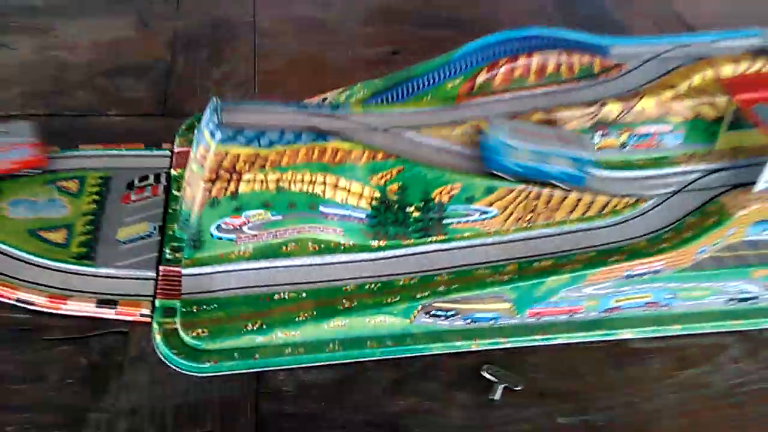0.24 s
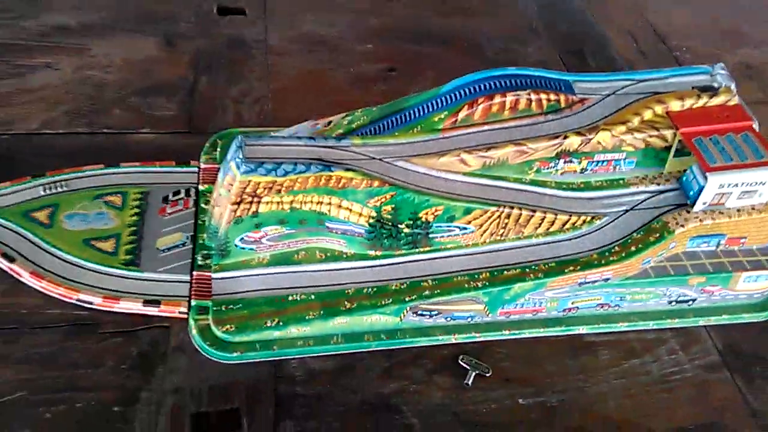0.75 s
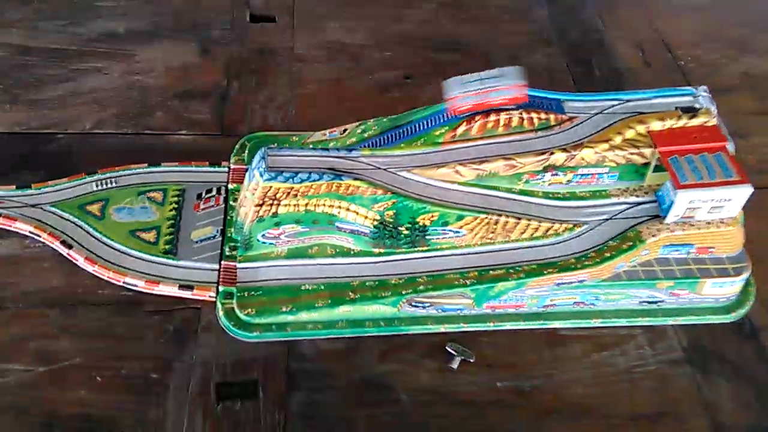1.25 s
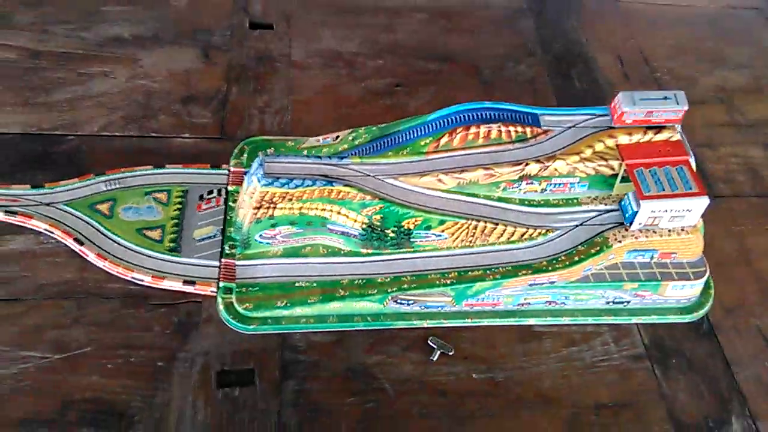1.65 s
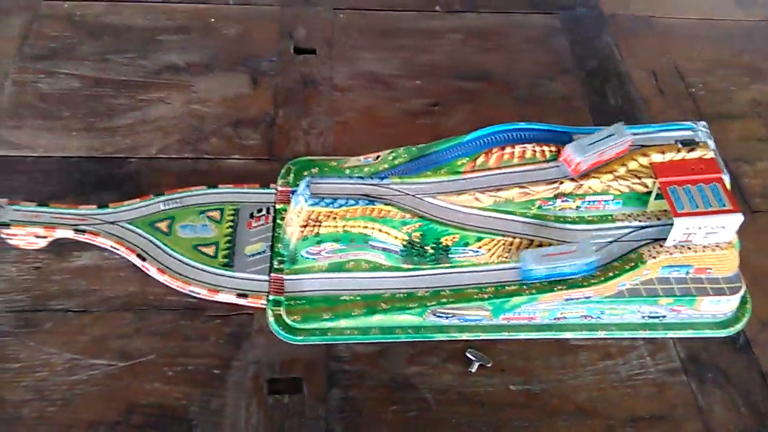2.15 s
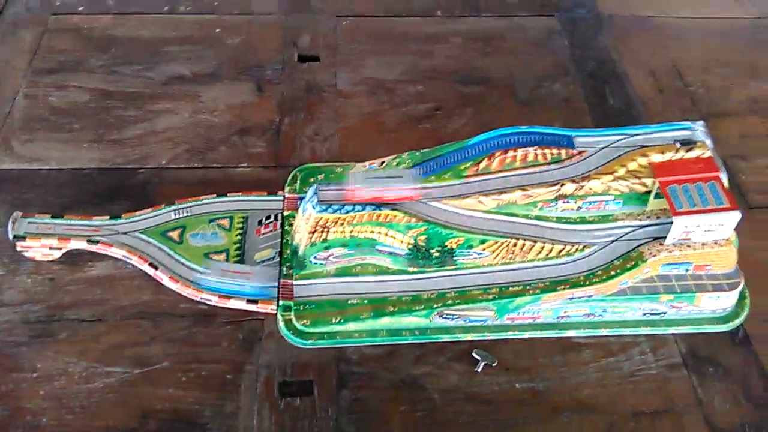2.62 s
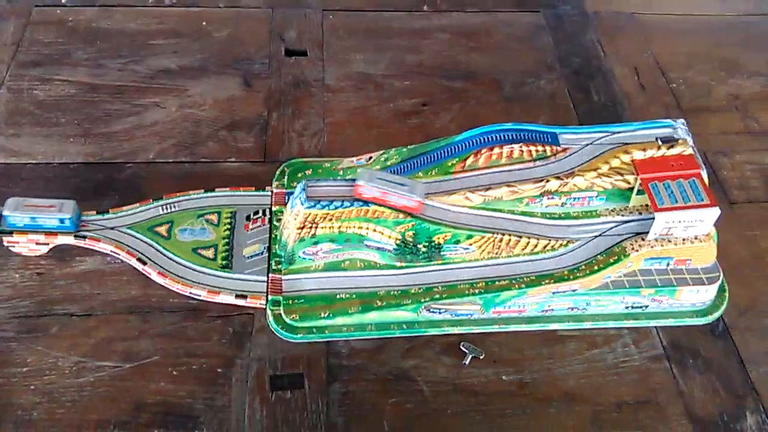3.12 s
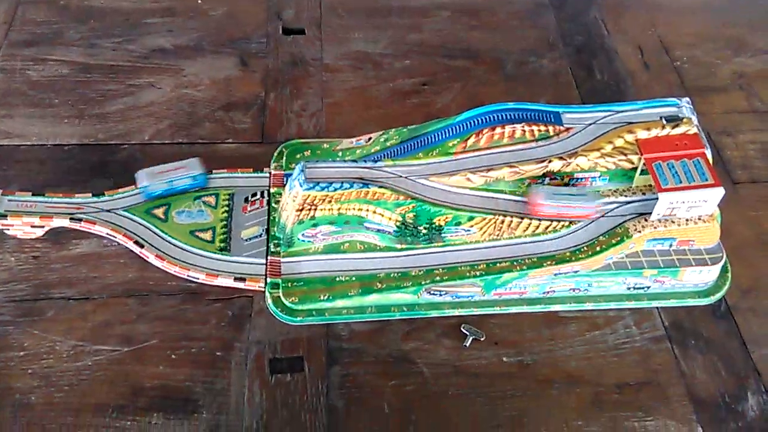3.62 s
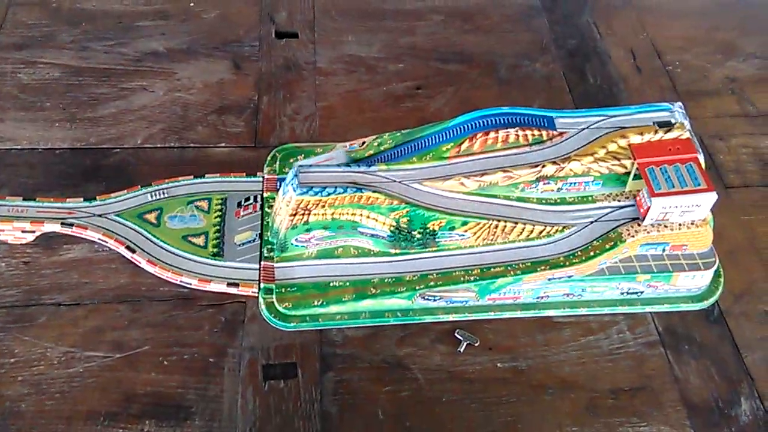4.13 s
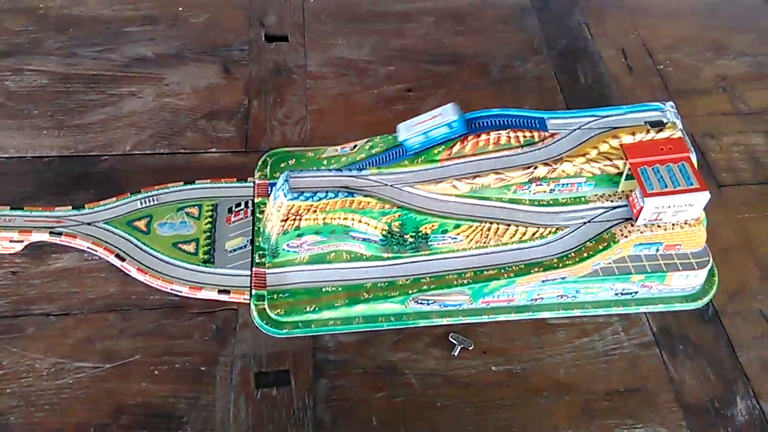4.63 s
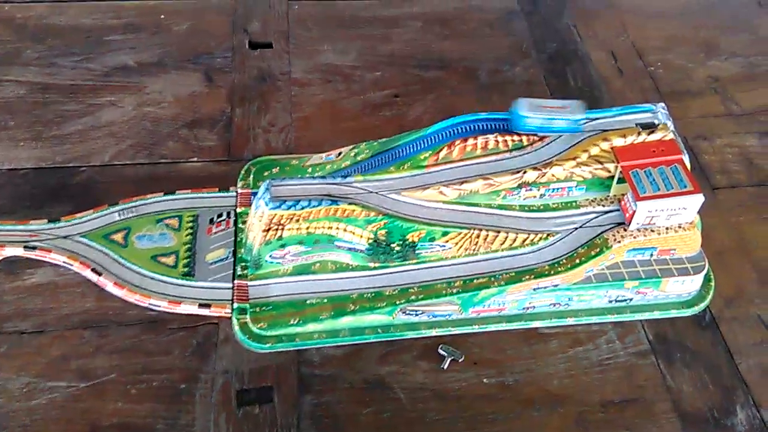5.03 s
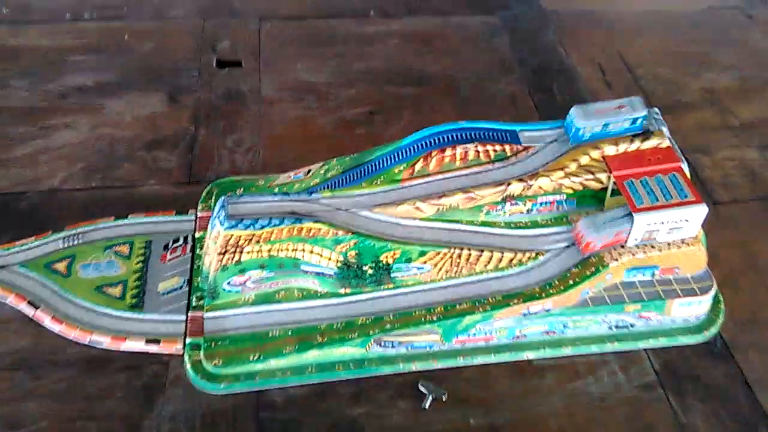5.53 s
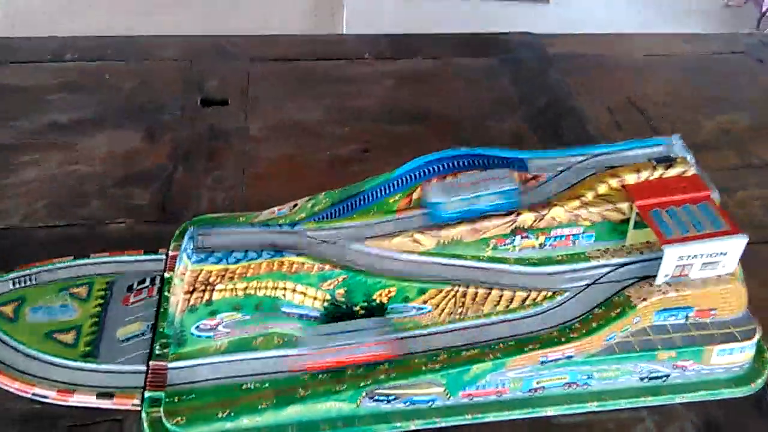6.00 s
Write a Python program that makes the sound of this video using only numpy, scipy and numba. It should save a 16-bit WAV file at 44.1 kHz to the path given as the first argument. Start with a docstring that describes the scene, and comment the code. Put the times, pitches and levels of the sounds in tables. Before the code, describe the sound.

Close handheld pickup in a small room: two wind-up tin cars circle a pressed metal track on a wooden table. A swelling roll and knocks lead to a loud ticking rattle up the hill, then quieter downhill rolling with clacks and clanks. A hard metallic knock starts a second rattling climb, softer in its middle, before final knocks and another swelling roll. Low thumps of the hand mark the first seconds.

```python
"""Tin cars on a clockwork track

Two clockwork tin cars run round a pressed tin track on a wooden table, heard from a hand-held phone.
Random contacts strike ringing tin: the sheet chatters and booms, wheels roll and loose bodies buzz.
Gears tick on the hill; cars knock at joints, bends and stops; panels clack, scrape and sing.
A small room answers with a noise tail, the hand bumps the phone, mostly at first,
and a limiter holds down the loudest rattles."""
import sys
import numpy as np
from scipy import signal
from scipy.fft import rfft, irfft
from scipy.io import wavfile
from scipy.ndimage import uniform_filter1d
from numba import njit

SR = 44100
rng = np.random.default_rng(int(sys.argv[2]) if len(sys.argv) > 2 else 0)


def bounce(signal):
    """Save signal as a 16-bit WAV file at the path given by the first command-line argument."""
    frames = np.transpose(np.atleast_2d(signal))
    limited = np.clip(frames, -1, 1)
    pcm = np.round(limited * 32767).astype(np.int16)
    wavfile.write(sys.argv[1], SR, pcm)


N = 276066
T = np.arange(N) / SR
RING = SR // 5  # samples in which the tin dies away

# modes of the tin track before any shift: f/Hz, energy level/dB, t60/s
TRACK_MODES = [(257, -6, .2), (338, -1, .16), (594, -10, .15), (788, -10, .13), (884, -4, .13),
               (1003, 0, .16), (1480, 0, .08), (1830, -1, .09), (2178, 0, .1), (2420, -2, .14),
               (2950, -7, .1), (3074, -6, .1), (3740, -4, .05), (4022, -7, .14), (6050, -13, .2)]
# dull colour of wheels and joints striking the track: f/Hz, level/dB
THUD_COLOUR = [(150, -8.5), (340, 7.5), (600, 4), (1000, 9), (1600, 17.5), (2200, 16.5), (2800, 18),
               (3600, -62), (5500, -25), (8000, -60.5)]


def mode_rings():
    """A decaying sine and cosine for each track mode, so that random mixes have random phases."""
    rings = []
    t = T[:RING]
    for hz, db, t60 in TRACK_MODES:
        decay = 10 ** (db / 20) / np.sqrt(t60) * np.exp(-np.log(1000) * t / t60)
        rings.append(decay * np.sin(2 * np.pi * hz * t))
        rings.append(decay * np.cos(2 * np.pi * hz * t))
    return np.array(rings)


MODE_RINGS = mode_rings()


def undb(db):
    """Amplitude factor of a level in dB."""
    return 10 ** (np.asarray(db) / 20)


def unit(x):
    """Scale to an energy of 1."""
    return x / np.sqrt(np.sum(x ** 2))


def curves(table):
    """The columns of a table, joined by straight lines in time."""
    s, *columns = np.transpose(table)
    return [np.interp(T, s, c) for c in columns]


def through(x, response):
    """Filter x with an impulse response, keeping its length."""
    return signal.oaconvolve(x, response)[:len(x)]


def add(out, s, x):
    """Mix x into out from time s."""
    i = max(int(s * SR), 0)
    out[i:i + len(x)] += x[:max(N - i, 0)]


def colour(points, size=2048):
    """Causal minimum-phase response of energy 1 with the given (Hz, dB) outline."""
    hz, db = np.transpose(points)
    log_hz = np.log(np.fft.rfftfreq(size, 1 / SR) + 1)
    gain = undb(np.interp(log_hz, np.log(hz), db))
    # folding the cepstrum forward in time makes the response causal
    cepstrum = irfft(np.log(gain))
    cepstrum[1:size // 2] *= 2
    cepstrum[size // 2 + 1:] = 0
    return unit(irfft(np.exp(rfft(cepstrum))))


def walk(rate):
    """Random wander with a spread near 1, through `rate` new values a second."""
    knots = rng.standard_normal(4096)
    return np.interp(T * rate, np.arange(len(knots)), knots)


def steady(x, size=3000):
    """Hold the rms near 1 over some tens of milliseconds, keeping the finer grain."""
    power = uniform_filter1d(uniform_filter1d(x ** 2, size), size // 2)
    return x / np.sqrt(np.abs(power) + 1e-12)


def fade(t60, size=RING):
    """Exponential decay that falls 60 dB in t60 seconds."""
    return np.exp(-np.log(1000) * T[:size] / t60)


@njit
def resonate(x, hz, width):
    """Band-pass whose centre moves; centre and width in Hz."""
    y, b, l = np.empty(len(x)), 0., 0.
    for i in range(len(x)):
        g, k = np.tan(np.pi * hz[i] / SR), width / hz[i]
        v = (b + g * (x[i] - l)) / (1 + g * (g + k))
        b, l, y[i] = 2 * v - b, l + 2 * g * v, k * v
    return y


@njit
def follow(x, attack, release):
    """Envelope that rises fast and falls slowly."""
    y, e = np.empty(len(x)), 0.
    for i in range(len(x)):
        e += (x[i] - e) * (attack if x[i] > e else release)
        y[i] = e
    return y


def gate(s, length):
    """Quick attack, hold, and a release that falls evenly in dB."""
    attack_s, release_db_per_s = 0.038, 246.5
    attack = np.clip((T - s) / attack_s, 0, 1)
    return attack * undb(-release_db_per_s * np.clip(T - s - length, 0, 1))


def shimmer(t60, crack_db):
    """A crack followed by the countless close modes of thin sheet, as decaying noise."""
    decay = fade(t60)
    ring = unit(rng.standard_normal(len(decay)) * decay)
    ring[0] += undb(crack_db)
    return unit(ring)


def track_ring(mode_shift=0.0097):
    """The track's strong modes, struck at one random place; the weight of the car shifts them a little."""
    ring = np.einsum("m,mt->t", rng.standard_normal(len(MODE_RINGS)), MODE_RINGS)
    t = T[:RING]
    stretched = t * (1 + mode_shift * rng.standard_normal())
    return unit(np.interp(stretched, t, ring, right=0))


def taps(rate, spread_db, hop):
    """Tiny metal contacts of uneven size, bunched by the hopping of the cars (hop in dB)."""
    hits = rng.random(N) < rate / SR
    signs = rng.choice([-1, 1], N)
    return steady(hits * signs * undb(spread_db * rng.standard_normal(N) + hop))


def air():
    """A steady hiss of coloured noise."""
    # colour of the air: f/Hz, level/dB
    air_colour = [(30, -18.5), (100, -9.5), (340, -1), (700, 12.5), (2400, 5.5), (3400, -31), (5000, 5),
                  (8000, -20.5), (14000, -47)]
    return undb(-58.5) * through(rng.standard_normal(N), colour(air_colour))


def hand():
    """Soft bumps of a cycle or two on the phone's case, over the low noise of the grip."""
    # colour of the grip's rumble: f/Hz, level/dB
    rumble_colour = [(20, -23), (40, -2), (60, -1), (110, -1.5), (200, -9), (400, -26), (900, -79.5)]
    # the hand shifts its grip: t/s, length/s, rumble level/dB
    grip_shifts = [(0.005, 1.87, -37), (2.014, 0.46, -45.5), (2.52, 0.36, -57), (3.7, 0.35, -55),
                   (5.11, 0.77, -63)]
    # bumps on the case: t/s, strength/dB, f of the settled pitch/Hz
    bumps = [(0.035, -18.5, 234), (0.066, -17, 180), (0.073, -16, 67), (0.206, -24, 94), (0.335, -13.5, 87),
             (0.467, -16, 104), (0.604, -29, 90), (0.883, -14, 72), (1.014, -20, 82), (1.06, -22, 85),
             (1.162, -16, 87), (1.302, -28, 84.3), (1.403, -12, 70), (1.463, -19, 76), (1.811, -20.5, 73.6),
             (2.117, -21, 83), (2.148, -18, 99), (2.335, -27, 110), (2.441, -16.5, 116), (2.484, -21, 76.4),
             (3.97, -34, 80), (5.889, -24.5, 230)]
    rest_db = -71.5  # the resting hand
    grip = undb(rest_db) + sum(undb(db) * gate(s, length) for s, length, db in grip_shifts)
    out = through(rng.standard_normal(N), colour(rumble_colour)) * grip
    out *= undb(5 * walk(16))  # uneven pressure
    t = T[:SR // 4]
    for s, db, hz in bumps:
        cycles = hz * t
        push = cycles / 0.9 * np.exp(1 - cycles / 0.48)
        bent_cycles = cycles * (1 + 0.68 * np.exp(-cycles))  # the pitch starts high
        add(out, s, undb(db) * push * np.sin(2 * np.pi * bent_cycles))
    return out


def room(x):
    """Reflections from table and walls as a short, dull noise tail that starts after 8 ms."""
    decay = fade(.35, size=SR // 3)
    tail = rng.standard_normal(len(decay)) * decay * (T[:len(decay)] > .008)
    dull = signal.butter(1, 6000, fs=SR, output="sos")
    return through(x, unit(signal.sosfilt(dull, tail)))


def pings():
    """A jolt sets a lightly damped tin mode singing; a close twin beats against it and the level trembles."""
    # singing modes: t/s, f/Hz, level/dB, t60/s
    singing_modes = [(0.004, 4350, -49, 0.19), (3.899, 4840, -28, .35), (5.43, 4990, -38, 0.29)]
    split_hz, twin_db = 39, -10.5
    out = np.zeros(N)
    for s, hz, db, t60 in singing_modes:
        decay = fade(t60, size=SR // 2)
        t = T[:len(decay)]
        twin = undb(twin_db) * np.sin(2 * np.pi * (hz + split_hz) * t)
        pair = np.sin(2 * np.pi * hz * t) + twin
        onset = np.minimum(t / .002, 1)
        add(out, s, undb(db) * decay * onset * pair)
    return out * undb(3 * walk(150))


def clacks(count=5):
    """A wheel drops onto a panel: a dull crack with a cluster of close panel modes that dies quickly."""
    # wheel drops: t/s, f around which the panel rings/Hz, level/dB
    wheel_drops = [(1.072, 1475, -22), (2.327, 1450, -28), (2.43, 1390, -35.5), (2.475, 1435, -37),
                   (2.525, 1440, -27), (2.562, 1520, -30), (2.595, 1346, -24), (2.653, 1367, -24),
                   (4.167, 1700, -21), (4.21, 1550, -25), (4.607, 2160, -31), (4.636, 2250, -26),
                   (4.746, 1570, -31.5), (4.924, 1434, -31.5), (5.627, 1453, -29.5), (5.837, 1793, -24.5),
                   (5.855, 1337, -25), (5.9, 1345, -29), (6.017, 1132, -28), (6.054, 1417, -26),
                   (6.099, 1250, -29), (6.156, 1280, -15)]
    ring_t60_s, crack_db = 0.07, -21.5
    out, t = np.zeros(N), T[:RING]
    thud = colour(THUD_COLOUR)
    for s, hz, db in wheel_drops:
        modes_hz = hz * (1 + 0.03 * rng.standard_normal((count, 1)))
        modes = rng.standard_normal((count, 1)) * np.sin(2 * np.pi * modes_hz * t)
        ring = unit(np.sum(modes, axis=0) * fade(ring_t60_s))
        crack = through(shimmer(t60=0.058, crack_db=-5.0), thud)
        # turns unit energy into a level at the start of the decay
        start_level = np.sqrt(SR * ring_t60_s / np.log(1e6))
        add(out, s, undb(db) * start_level * (ring + undb(crack_db) * crack))
    return signal.sosfilt(signal.butter(6, [600, 3000], "band", fs=SR, output="sos"), out)


def panels(width_share=0.047, edge=0.0033, waver=.012):
    """Scraping wheels keep one mode of a panel ringing, with a rough grain and a wavering pitch."""
    # scraped panels: t/s, length/s, f before wavering/Hz, rms level/dB
    scraped_panels = [(0.354, 0.19, 1494, -29), (0.377, 0.093, 940, -46), (1.008, 0.031, 988, -24.5),
                      (1.366, 0.091, 1490, -26.5), (1.46, 0.093, 1454, -27), (1.737, 0.089, 846, -34),
                      (1.933, 0.065, 956, -41), (2.454, .2, 1353, -39), (2.767, .14, 1520, -33),
                      (2.979, 0.031, 1605, -23), (3.113, 0.055, 2140, -26.5), (3.501, 0.057, 2260, -47),
                      (3.503, 0.06, 2820, -51.5), (3.623, 0.041, 1403, -35.5), (3.764, 0.057, 1840, -22),
                      (4.478, 0.23, 2190, -37.5), (4.73, 0.23, 2610, -39), (5.03, 0.11, 1494, -27.5),
                      (5.033, 0.072, 457, -34.5), (5.624, 0.18, 904, -47.5), (6.067, 0.067, 1345, -32.5),
                      (6.126, 0.1, 2310, -35.5), (6.169, 0.075, 1290, -29)]
    out = np.zeros(N)
    scrape = taps(800, 2.5, 3 * walk(70))
    bend = 1 + waver * walk(25)
    for s, length, hz, db in scraped_panels:
        t = T[:int((length + edge) * SR)]
        centre, drive = (np.roll(v, -int(s * SR))[:len(t)] for v in (hz * bend, scrape))
        narrow = resonate(drive, centre, width_share * hz)
        ring = steady(resonate(narrow, centre, 3 * width_share * hz), size=1000)
        ring *= np.clip((length + edge - t) / (2 * edge), 0, 1)
        add(out, s, undb(db) * unit(ring) * np.sqrt(length * SR))
    return out


def ratchet(count=100):
    """Each gear tooth shakes a crisp tick out of the car's tin body, nearly in step and uneven in strength."""
    # colour of a tooth: f/Hz, level/dB
    tooth_colour = [(1200, -23.5), (2300, 6.5), (3000, 5.5), (3700, 2), (4700, -1.5), (5600, -0.5),
                    (6400, -10), (8000, -41), (10000, -52)]
    # pulls of the gear: t/s, length/s, tooth rate/Hz, level/dB, f of the body's ring/Hz, its width/Hz
    gear_pulls = [(0.598, 0.93, 83.5, -31, 3900, 2200), (4.478, 0.67, 61.3, -39.5, 4770, 700)]
    out = np.zeros(N)
    tooth = colour(tooth_colour)
    for s, length, teeth_hz, db, ring_hz, width_hz in gear_pulls:
        body = unit(resonate(tooth, np.full(len(tooth), float(ring_hz)), float(width_hz)))
        late, strength = rng.standard_normal((2, count))
        for k in range(min(count, int(length * teeth_hz))):
            tick = through(shimmer(t60=.025, crack_db=-6), body) * undb(db + 1.5 * strength[k])
            # the level is that of the run of ticks, whatever their rate
            add(out, s + (k + .04 * late[k]) / teeth_hz, tick * np.sqrt(SR / teeth_hz))
    return out


def knocks(count=4):
    """A car strikes a joint, bend or stop; track and body ring together, and hard knocks bounce for longer."""
    # colour of the body's clink: f/Hz, level/dB
    clink_colour = [(1500, -6.5), (3200, 5), (4400, 15), (5200, 17), (6500, 4), (7300, -12), (8100, -29.5),
                    (9200, -19), (10400, -35), (14000, -87)]
    # strikes: t/s, energy level of the track's thud/dB, energy level of the body's clink/dB
    strikes = [(0.1227, -2, 8.5), (0.31, 4, -2.5), (0.589, 0, -4), (0.633, -6, 3.5), (1.688, -17, 3),
               (1.714, -11, 1), (1.762, 3, -1.5), (1.921, -13, -14.5), (1.969, -15, -9.5),
               (2.043, -27, -18), (2.18, -12, -6.5), (2.204, -15, -21), (2.24, -26, -15.5),
               (2.679, 3, -2.5), (2.918, 3, 0), (2.983, -1, -10), (3.049, -32, -7), (3.12, 0.5, -1.5),
               (3.153, -0.5, 1.5), (3.347, -27, -35), (3.491, -31, -31), (3.502, -11, -19),
               (3.658, 2.5, -8), (3.9, 7, 9), (4.118, 10.5, 4), (4.916, -8.5, -8), (5.043, -10, -3),
               (5.122, -0.5, 0.5), (5.138, 4, -3.5), (5.322, -23, -9.5), (5.37, -5, -8), (5.39, 2.5, -4),
               (5.411, 1, -16), (5.43, -6, -4), (5.586, -20, -8.5), (5.616, -21, -23), (5.628, -23, -7),
               (5.834, -6, -2.5), (5.856, -17, -8.5), (5.891, -10.5, -8.5), (6.241, 4.5, -9)]
    bounce_loss_db, ease = 7.5, 1  # loss per bounce after a 0 dB knock; dB less loss per dB of strength
    out = np.zeros(N)
    thud, clink = colour(THUD_COLOUR), colour(clink_colour)
    for s, thud_db, clink_db in strikes:
        gaps = rng.uniform(.006, 0.021, count)
        loss_db = max(3, bounce_loss_db - ease * max(thud_db, clink_db))
        for k in range(count):
            track = through(shimmer(t60=0.099, crack_db=-5.0) + undb(-25.0) * track_ring(), thud)
            body = through(shimmer(t60=0.13, crack_db=-11.5) + undb(-30.5) * track_ring(), clink)
            both = undb(thud_db) * track + undb(clink_db) * body
            add(out, s + gaps[:k].sum(), undb(-loss_db * k) * both)
    return out


def contact():
    """Gain that dips briefly as the climbing car loses contact and its rattle drops out."""
    # slips on the hill: t/s, half length/s, depth/dB
    slips = [(4.465, 0.061, 2.5), (4.848, 0.0049, 8), (4.879, 0.0053, 8), (4.915, 0.0063, 8)]
    return undb(-sum(depth_db * np.exp(-((T - s) / half) ** 2) for s, half, depth_db in slips))


def coast(s, length, *dbs):
    """Gains of the four parts as a car speeds up evenly: louder with the distance rolled."""
    # shares of the growth in dB taken by clatter, boom, wheels, buzz [no unit]
    growth_shares = (1.47, 0.2, 0.93, 0.98)
    growth_db = 72.5 * np.clip(T - s, 0, length) ** 2  # dB per s^2
    gains = [undb(db + share * growth_db) for db, share in zip(dbs, growth_shares)]
    return gate(s, length) * np.array(gains)


def climb(s, length, clatter_db, boom_db, roll_db, buzz_db, lull_db):
    """Gains of the four parts on the hill: loud at both ends, with a lull between."""
    # shares of the lull in dB taken by clatter, boom, wheels [no unit]
    lull_shares = (0.68, 1.21, 1)
    # as shares of the climb: track and wheels are quietest on the crest, the body early on the slope
    crest_at, slope_at, lull_width = 0.69, 0.42, 0.42
    progress = np.clip((T - s) / length, 0, 1)
    crest = lull_db * np.exp(-((progress - crest_at) / lull_width) ** 2)
    slope = lull_db * np.exp(-((progress - slope_at) / lull_width) ** 2)
    track = [db - share * crest for db, share in zip((clatter_db, boom_db, roll_db), lull_shares)]
    buzz = buzz_db - 0.32 * slope
    return gate(s, length) * undb(track + [buzz])


def shake(s, length, *dbs):
    """Gains of the four parts in a short, even rattle."""
    return np.outer(undb(dbs), gate(s, length))


def motion():
    """Levels in dB of clatter, boom, wheels and buzz; the powers of all moves add."""
    # a car coasts downhill: t/s, length/s, then at its start clatter, boom, wheels, buzz level/dB
    downhill = [(0, 0.15, -59, -44.5, -51, -75), (0.124, 0.423, -46.5, -37.5, -39, -44),
                (1.89, 0.22, -64, -49.5, -48.5, -54), (2.155, 0.49, -73, -38.5, -43.5, -48.5),
                (3.224, 0.63, -74, -47, -57, -72.5), (5.185, 0.16, -61, -54, -47.5, -60.5),
                (5.463, 0.32, -64.5, -49.5, -54, -57), (5.806, 0.56, -57, -45, -38, -44.5)]
    # clockwork hauls a car over the hill: t/s, length/s, clatter, boom, wheels, buzz level/dB,
    # lull before its shares/dB
    uphill = [(0.566, 1.036, -24, -24, -20.5, -27.5, 10.5), (3.894, 1.297, -27.5, -23.5, -22, -31.5, 20)]
    # a car shakes in a bend or against a stop: t/s, length/s, clatter, boom, wheels, buzz level/dB
    bends_and_stops = [(0.119, 0.0068, -14.5, -48, -17.5, -17), (0.327, 0.12, -24.5, -57, -26, -27.5),
                       (1.651, 0.13, -28.5, -28, -29.5, -30.5), (2.606, 0.1, -36, -34, -32, -34),
                       (2.661, .23, -27.5, -27.5, -24.5, -28.5), (2.962, 0.031, -25, -29.5, -23, -31),
                       (3.113, 0.035, -25, -26, -43, -33.5), (3.681, 0.11, -19, -26, -14, -21),
                       (4.267, 0.085, -49, -27.5, -47, -49), (5.016, 0.052, -45, -50, -40, -44),
                       (5.355, 0.068, -29.5, -28.5, -33, -28.5), (5.619, 0.022, -45, -39, -31.5, -34.5)]
    moves = ((coast, downhill), (climb, uphill), (shake, bends_and_stops))
    power = sum(move(*row) ** 2 for move, table in moves for row in table)
    return 10 * np.log10(power + 1e-12)


def sheet(hits, outline, t60, crack_db, modes_db, size=5000):
    """The cars move on, so each short stretch of contacts meets a new place on the tin with its own ring."""
    out = np.zeros(N)
    window = signal.windows.cosine(size)
    for i in range(0, N, size // 2):
        part = hits[i:i + size]
        fade_in_out = window[:len(part)] if i else np.cos(np.linspace(0, np.pi / 2, size))
        ring = shimmer(t60, crack_db) + undb(modes_db) * track_ring()
        add(out, i / SR, signal.fftconvolve(part * fade_in_out, ring))
    return steady(through(out, colour(outline)))


def cars():
    """Wheels chatter on the track and roll over its resonant stretches; the sheet booms, loose bodies buzz."""
    # colours of the four parts: f/Hz, level/dB
    clatter_colour = [(200, -20), (350, -23.5), (620, -28), (950, -8.5), (1500, -24.5), (2200, 8),
                      (3200, 4), (4000, 1.5), (5200, -6.5), (6400, -7), (7200, -20), (8000, -39),
                      (9200, -36.5), (10300, -60)]
    boom_colour = [(120, -37), (190, -2), (260, -4), (345, 1.5), (430, 2), (520, -9.5), (700, -6.5),
                   (1200, -66.5)]
    roll_colour = [(400, -29.5), (680, -1), (900, 3.5), (1400, -3.5), (2200, 0.5), (2700, -2.5),
                   (3300, -16), (6000, -50.5)]
    body_colour = [(2000, -53.5), (3400, -9.5), (4000, 2.5), (4550, 7), (5200, 3), (5800, 1.5), (6500, -16),
                   (7600, -51.5), (10000, -71.5)]
    # the boom of the sheet shifts as the cars move over it: t/s, centre f/Hz
    boom_centre = [(0.0, 345), (0.6, 297), (1.1, 323), (1.38, 383), (2.5, 406), (2.9, 312), (3.3, 363),
                   (4.05, 325), (5.05, 428), (5.42, 313), (6.26, 305)]
    # the body buzz shifts as the cars turn: t/s, centre f/Hz
    buzz_centre = [(0.0, 4180), (1.85, 5000), (1.93, 5430), (2.51, 4220), (2.54, 4230), (3.23, 5200),
                   (5.77, 4430), (6.26, 3880)]
    # the ringing stretch of sheet under the wheels: t/s, resonance f/Hz
    under_wheels = [(0.0, 1415), (1.06, 1330), (1.38, 1535), (2.02, 1070), (2.34, 1574), (4.41, 1530),
                    (4.48, 1080), (4.64, 1600), (5.53, 1330), (5.77, 960), (5.8, 1200), (6.08, 1280),
                    (6.26, 1120)]
    clatter_db, boom_db, roll_db, body_db = motion()
    hop = 1.7 * walk(80) + 1.0 * walk(25)
    wheels = taps(1400, 2.6, hop)
    clatter = sheet(wheels, clatter_colour, t60=.04, crack_db=-2, modes_db=-14.5)
    # harder contacts are shorter and so brighter
    edge = steady(signal.sosfilt(signal.butter(4, 6000, "high", fs=SR, output="sos"), clatter))
    clatter = clatter + edge * undb(0.59 * clatter_db + 9.5)
    boom = sheet(taps(700, 3.4, hop), boom_colour, t60=0.094, crack_db=-11.5, modes_db=-18)
    boom = steady(resonate(boom, curves(boom_centre)[0], 170.))
    loose = taps(1200, 4, hop)
    body = sheet(wheels + loose, body_colour, t60=.04, crack_db=-1, modes_db=-16)
    body = steady(resonate(body, curves(buzz_centre)[0], 1400.))
    roll = sheet(taps(900, 3.4, 1.1 * hop), roll_colour, t60=0.04, crack_db=-5, modes_db=-14)
    roll = steady(resonate(roll, curves(under_wheels)[0], 440.0))
    return clatter * undb(clatter_db) + boom * undb(boom_db) + roll * undb(roll_db) + body * undb(body_db)


def scene():
    """The toy, the room, the air and the hand on the phone, in stereo."""
    rattle = (cars() + panels() + ratchet()) * contact()
    toy = rattle + knocks() + clacks() + pings()
    mid = toy + undb(-16.5) * room(toy) + hand() + air()
    # only the treble has a little width: it flickers between left and right
    treble = signal.sosfilt(signal.butter(8, 5200, "high", fs=SR, output="sos"), toy)
    side = undb(-9.5) * treble * walk(400)
    return np.array([mid + side, mid - side])


def record(dry):
    """The phone drops the deepest bass, its limiter holds the loudest rattles at one level, the top is cut."""
    attack_s, release_s, ceiling_db, top_hz = .0005, .025, -19.5, 14300
    x = signal.sosfilt(signal.butter(3, 44, "high", fs=SR, output="sos"), dry)
    power = uniform_filter1d(np.mean(x ** 2, axis=0), size=220)
    power = follow(power, 1 / (attack_s * SR), 1 / (release_s * SR))
    gain = np.minimum(1, undb(ceiling_db) / np.sqrt(np.abs(power) + 1e-12))
    return signal.sosfilt(signal.ellip(8, .2, 70, top_hz, fs=SR, output="sos"), x * gain)


dry = scene()
out = record(dry)
bounce(out)
```